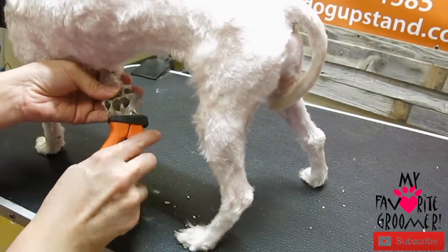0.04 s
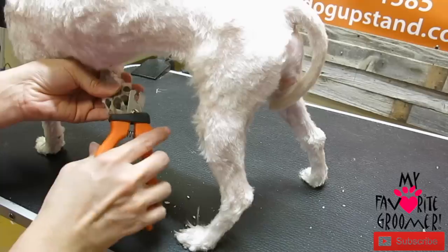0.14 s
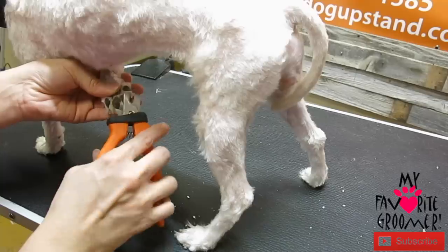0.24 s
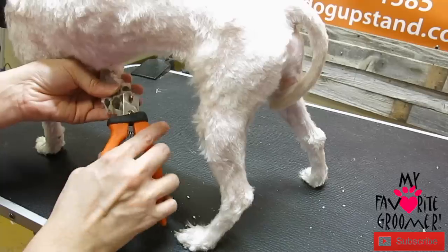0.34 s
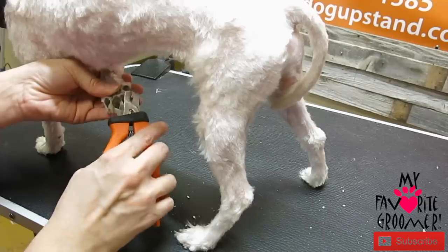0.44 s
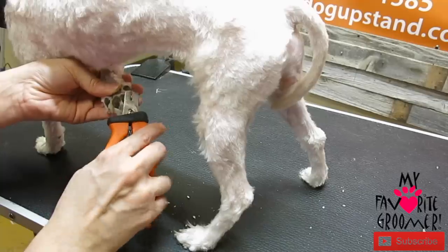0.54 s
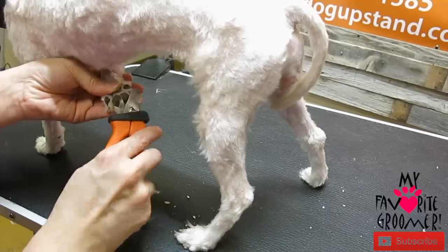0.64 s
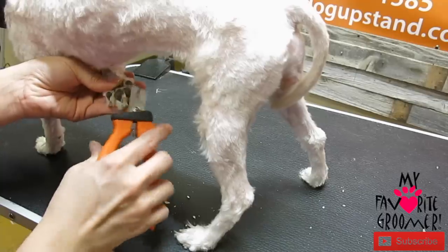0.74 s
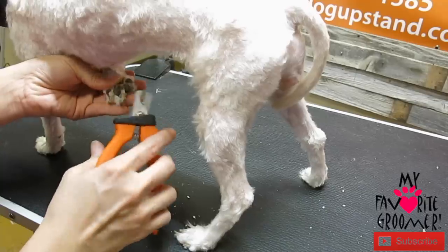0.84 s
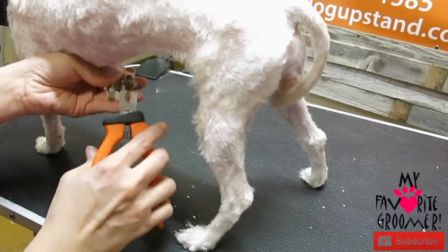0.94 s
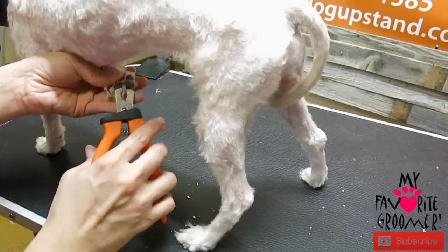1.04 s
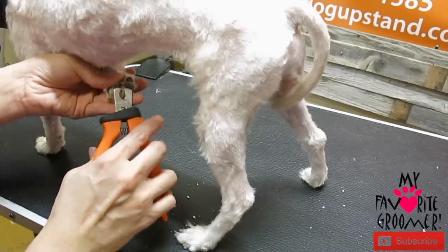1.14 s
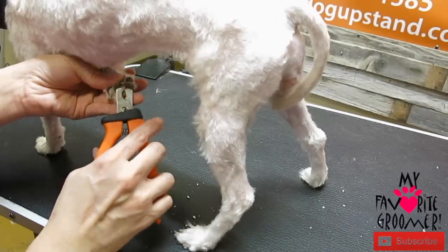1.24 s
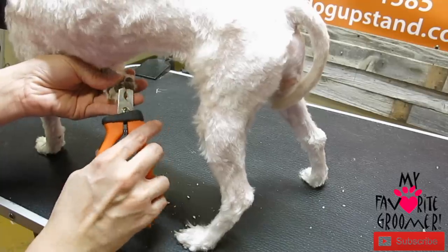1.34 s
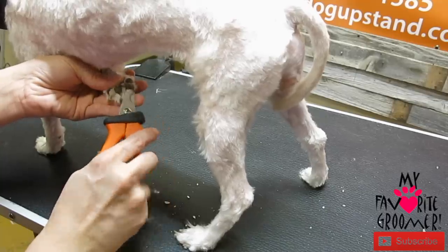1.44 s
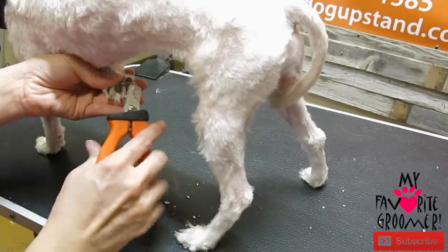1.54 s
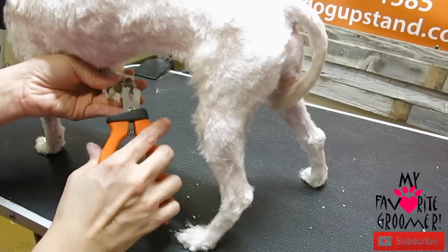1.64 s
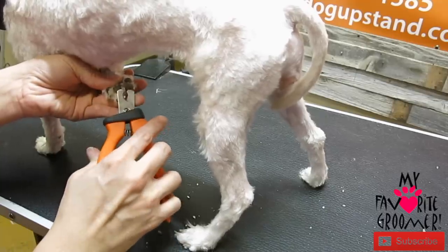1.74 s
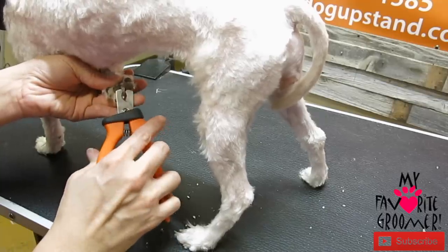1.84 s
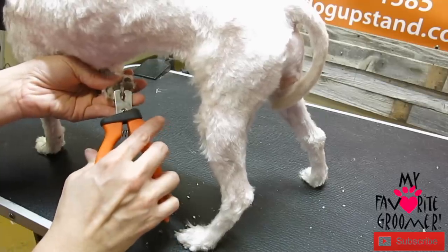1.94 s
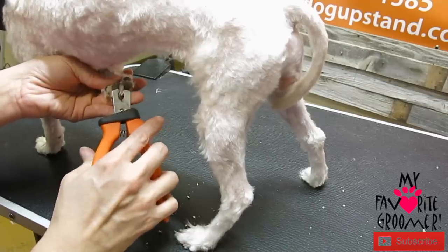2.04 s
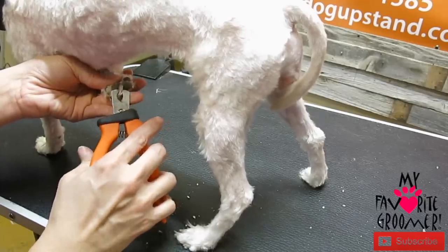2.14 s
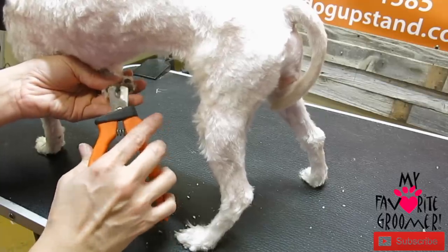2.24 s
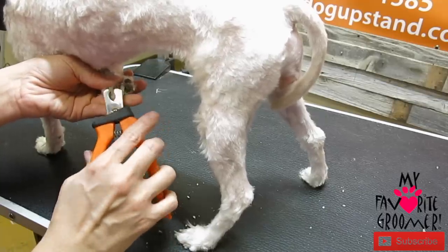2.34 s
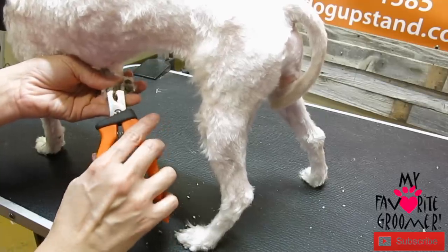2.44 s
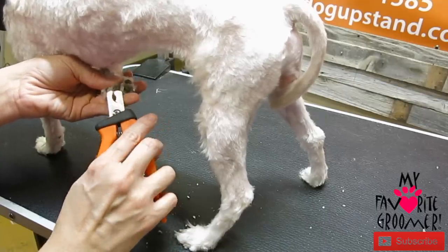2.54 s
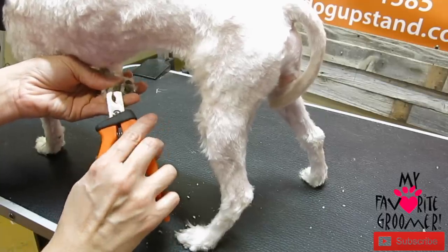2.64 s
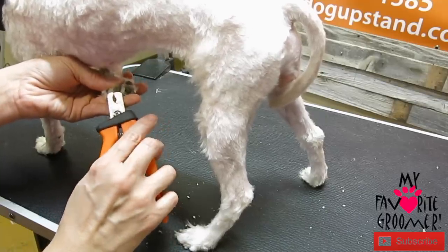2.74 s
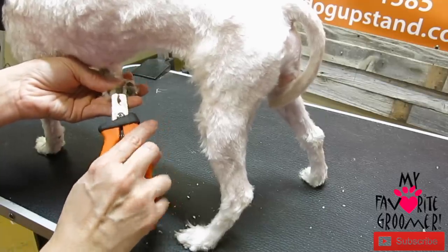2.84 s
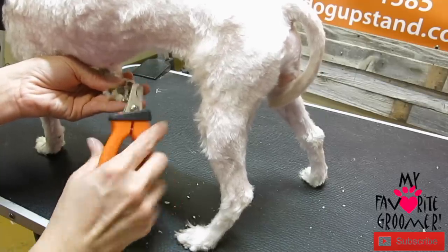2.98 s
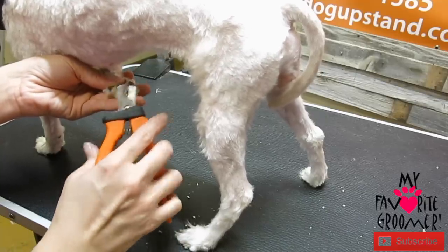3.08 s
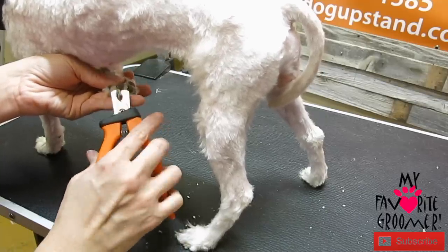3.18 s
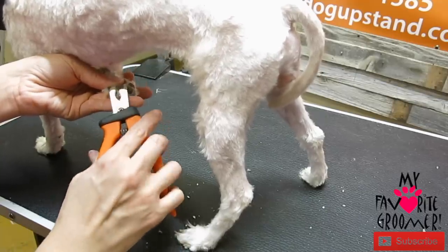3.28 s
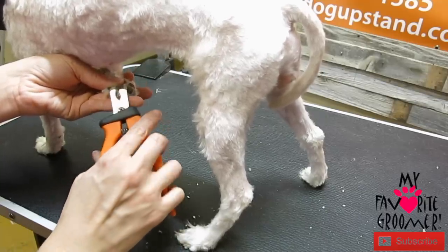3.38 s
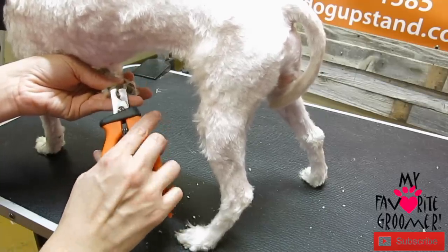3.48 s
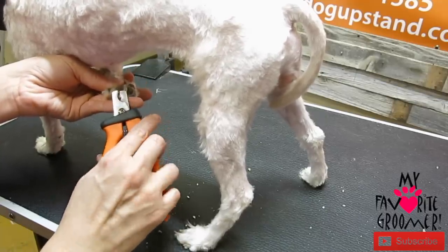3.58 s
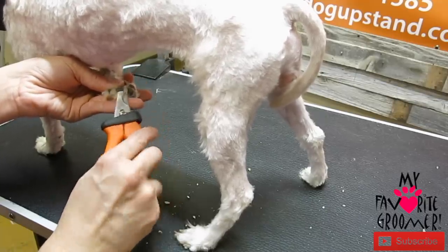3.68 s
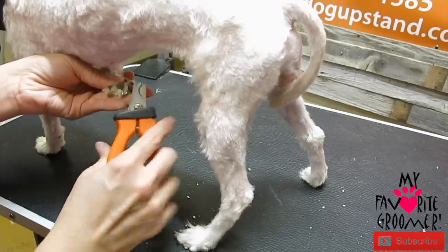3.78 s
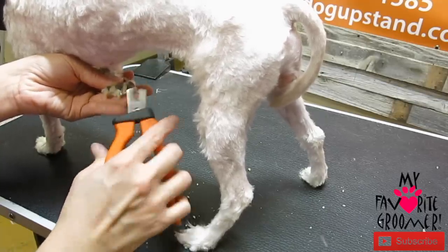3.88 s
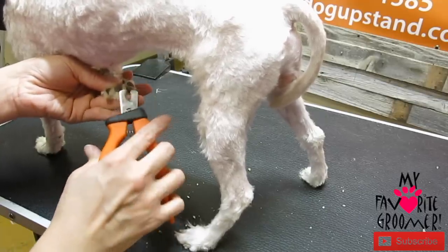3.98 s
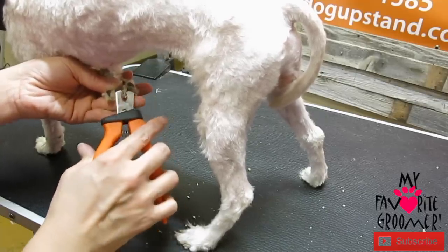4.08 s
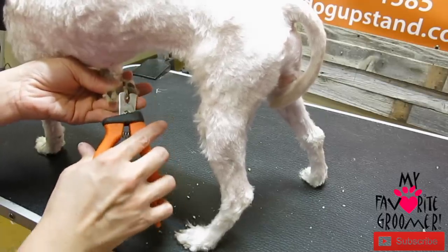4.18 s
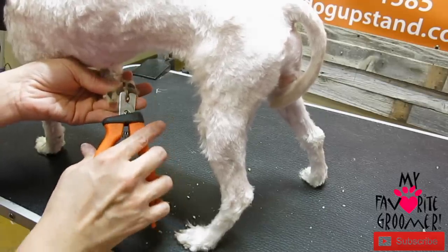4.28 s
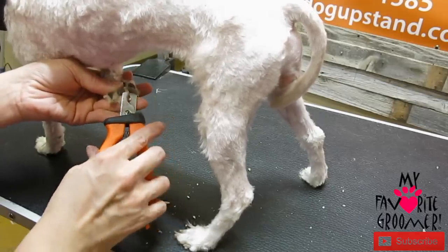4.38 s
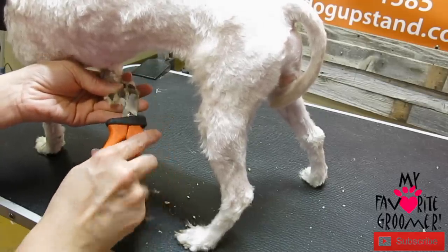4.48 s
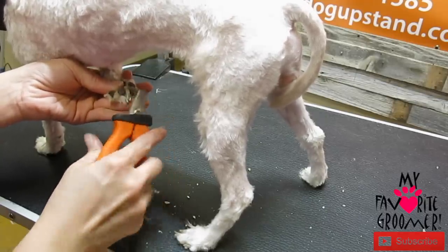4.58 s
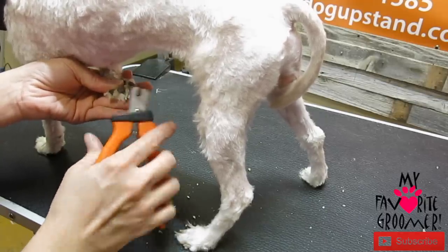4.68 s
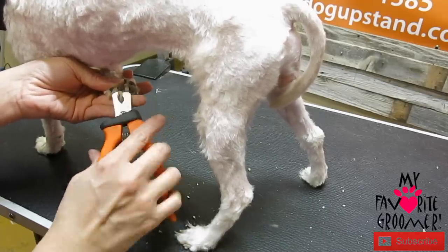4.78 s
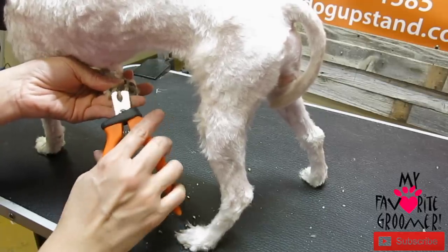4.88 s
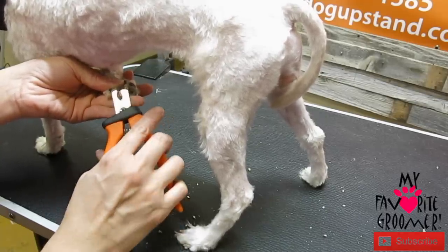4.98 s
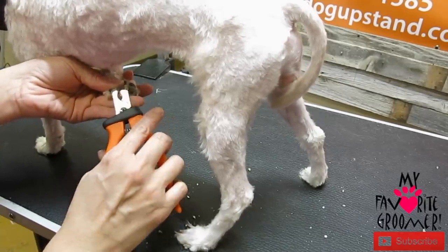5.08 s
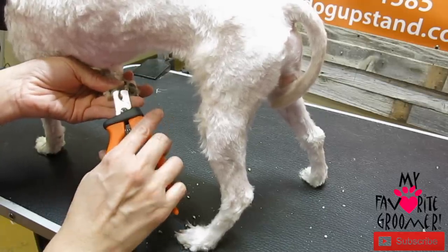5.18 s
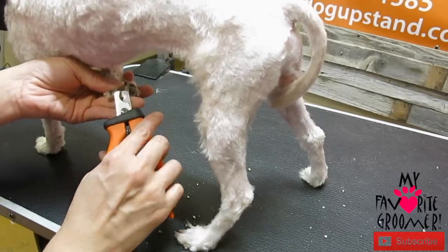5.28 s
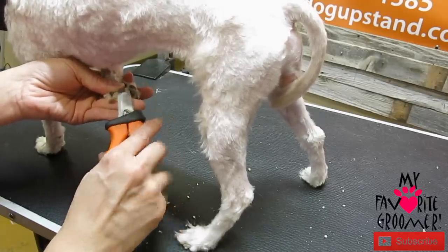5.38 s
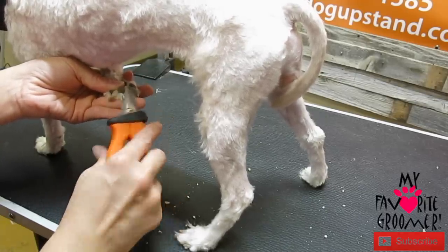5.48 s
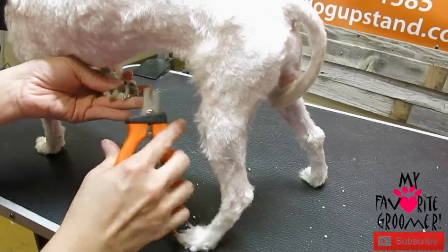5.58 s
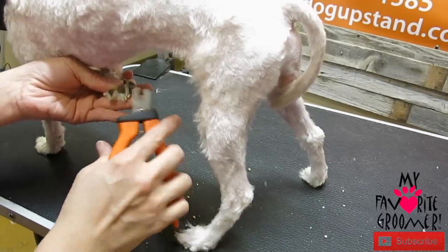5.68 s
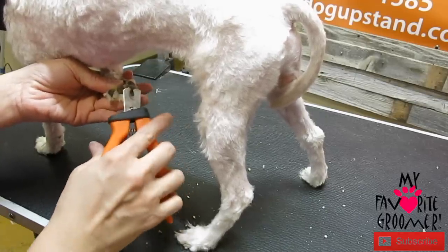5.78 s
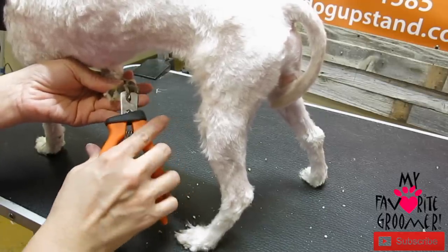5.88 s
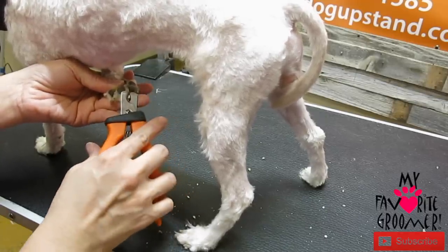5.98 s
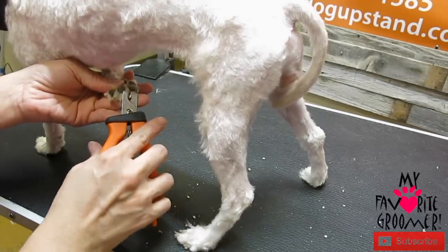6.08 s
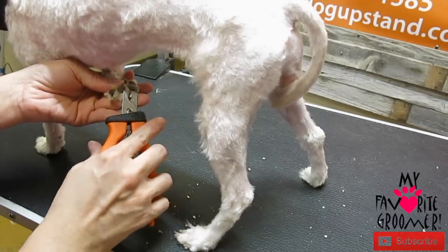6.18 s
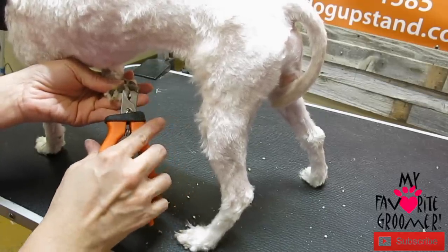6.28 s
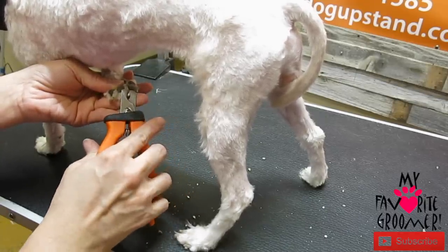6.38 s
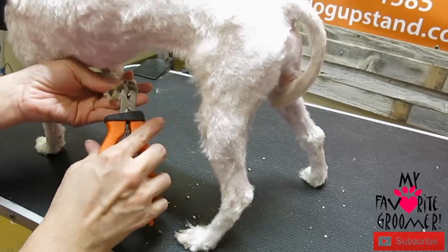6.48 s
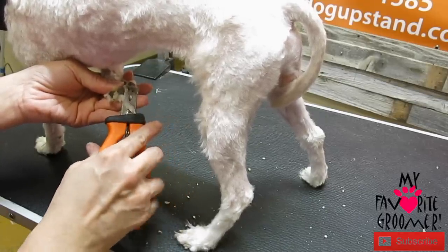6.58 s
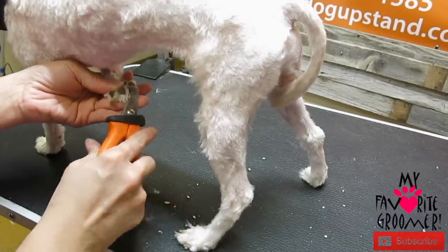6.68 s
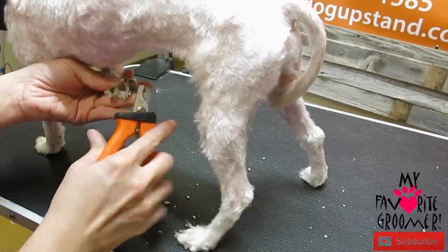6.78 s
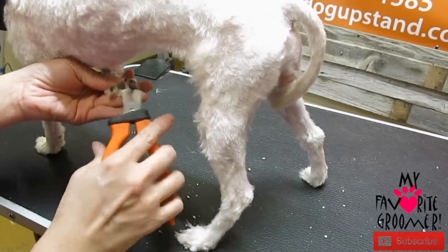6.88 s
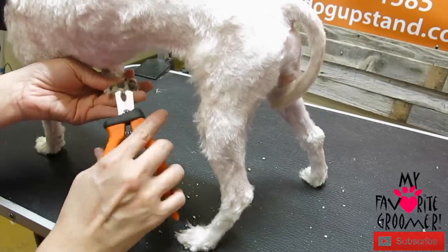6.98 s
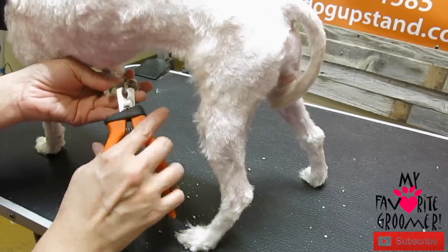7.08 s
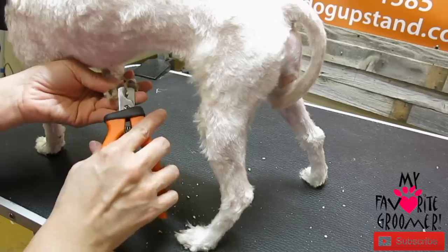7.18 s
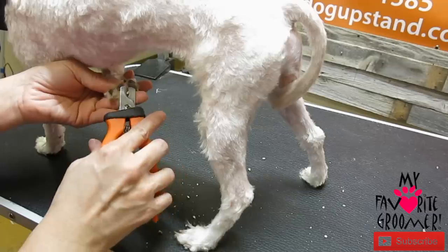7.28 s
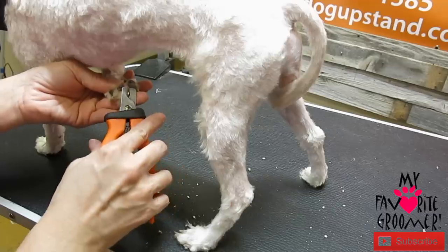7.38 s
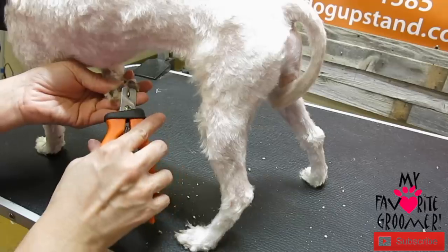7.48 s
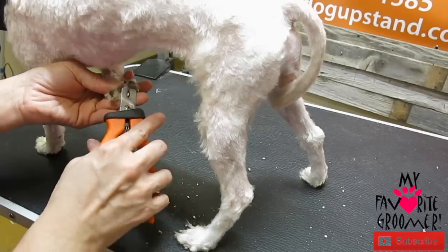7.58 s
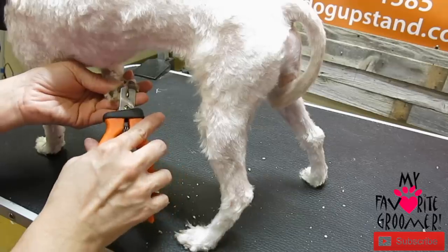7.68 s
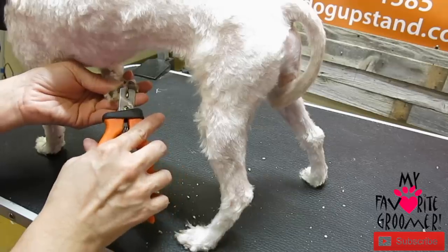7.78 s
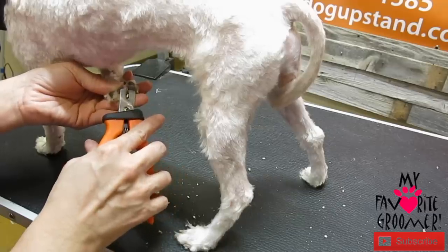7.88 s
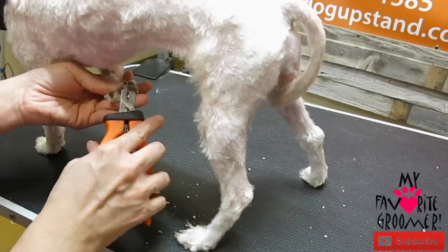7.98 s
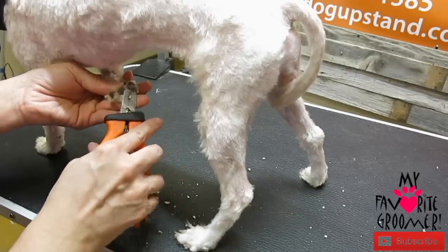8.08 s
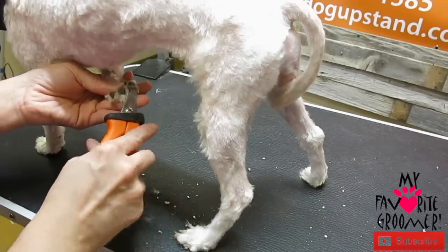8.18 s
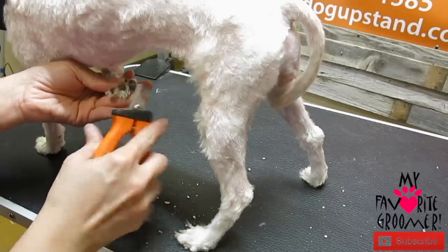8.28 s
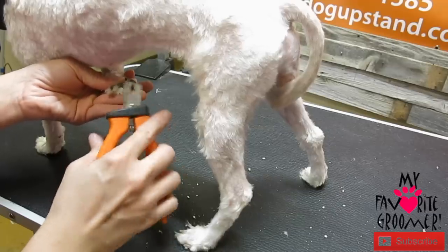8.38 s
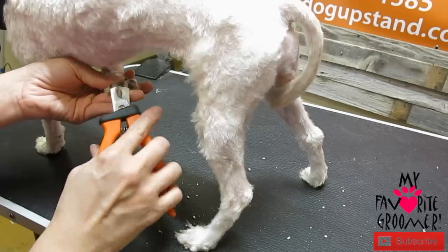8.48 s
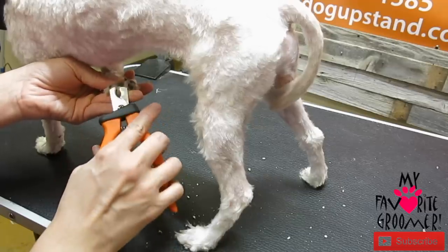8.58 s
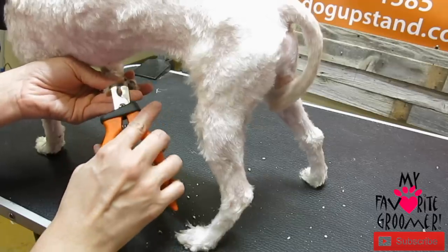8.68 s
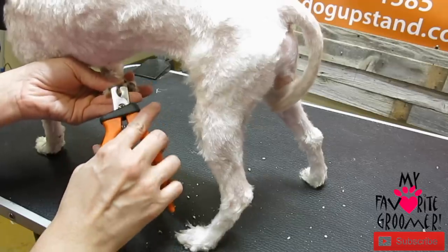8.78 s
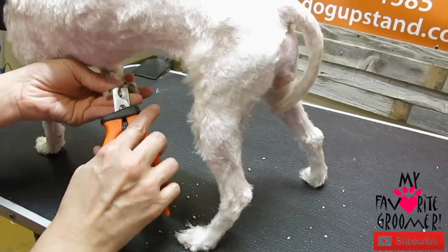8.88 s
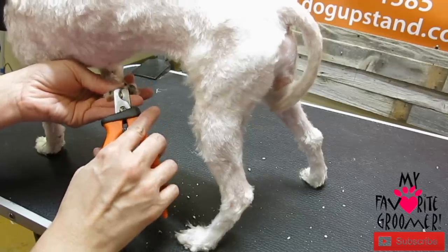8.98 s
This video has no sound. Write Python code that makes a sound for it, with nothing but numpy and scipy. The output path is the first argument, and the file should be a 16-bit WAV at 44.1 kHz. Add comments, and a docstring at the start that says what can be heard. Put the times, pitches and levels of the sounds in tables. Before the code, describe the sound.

Plier-style clippers cut a dog's nails right beside the microphones in a small room. Nine loud, crisp snaps come at uneven gaps, each a nail crack and a steel jaw slam almost fused, with a short bright echo. Small catching clicks and gritty creaks precede most cuts, and light handle ticks follow. Quiet ventilation and low motor hum lie behind, dipping after each snap and creeping back.

```python
"""Plier-style clippers cut a dog's nails close to the microphones, on a grooming table in a small room.
Each cut is two noise bursts: the nail cracks, then the jaws slam shut 2 to 26 ms later, with the room's echoes.
Before most cuts the blades catch and the nail creaks in random grains; between cuts the handles tick.
Behind are filtered-noise ventilation and rumble, and motors and mains hum made of sines.
The recorder's gain control ducks the room after every snap."""
import sys
import numpy as np
from scipy import signal
from scipy.fft import rfft, irfft, next_fast_len
from scipy.io import wavfile
from scipy.ndimage import uniform_filter1d

SR = 44100
rng = np.random.default_rng(int(sys.argv[2]) if len(sys.argv) > 2 else 0)


def int16_out(signal):
    """Quantize to a 16-bit WAV file."""
    q = np.round(np.clip(np.atleast_2d(signal).T, -1, 1) * 32767)
    wavfile.write(sys.argv[1], SR, q.astype(np.int16))


N = 398223
TIME = np.arange(N) / SR

# each cut, a crack of the nail and then the slam of the jaws: crack t/s, slam delay/s, crack level/dB,
# slam level/dB, knock level/dB (relative), knock f/Hz, knock resonance/dB, hollow of the handles/dB,
# slam's edge above 9 kHz/dB (relative), room send/dB
CUTS = [(0.0061, 0.015, 3.5, 10, -8, 1750, 5, -1, 7, 5.5), (0.6257, 0.026, 3, 10.5, -6, 2050, 4, 1, 8, 2.5),
        (1.4834, 0.0029, 12, 15.5, -7.5, 1960, 7.5, -1.5, 5.5, 1.5),
        (2.9430, 0.0024, 13.5, 12, -5.5, 1120, 2, -2.5, -0.5, 5.5),
        (3.7040, 0.0036, 11.5, 7.5, -6, 2430, 2, 1, 7.5, 6),
        (4.5308, 0.0035, 7, 10, -1, 2380, 1.5, -2.5, -3, 6),
        (5.46, 0.0035, 8.5, 9.5, -8, 1644, 6.5, 9, 7, 3.5),
        (6.6834, 0.0024, 10, 9.5, -6.5, 1850, 4.5, 3.5, 9, 2),
        (8.1791, 0.0072, 3, 10.5, -4, 1730, 10.5, -4.5, 7.5, 3.5)]
# how strongly the distant motor comes through: t/s, level/dB
MOTOR_LEVEL = [(0, -59.5), (1.0, -59.0), (1.2, -41.5), (1.42, -40.5), (1.65, -58.5), (2.8, -54.5),
               (3.2, -38.5), (4.2, -46.5), (5.1, -47), (6.1, -39), (7.0, -48.5), (7.95, -47), (9.0, -52.7)]


def from_db(db):
    """Decibels to gain."""
    return 10 ** (np.asarray(db) / 20)


def rms_one(x):
    """Scale to rms 1."""
    return x / np.sqrt(np.mean(x ** 2) + 1e-20)


def in_time(rows):
    """Each column of a curve, at every sample."""
    s, *columns = np.transpose(rows)
    return [np.interp(TIME, s, c) for c in columns]


def at_hz(points, hz):
    """Read a spectrum on a log-frequency axis."""
    f, value = np.transpose(points)
    return np.interp(np.log(hz + 1e-9), np.log(f), value)


def band_noise(low_hz, high_hz, shape):
    """White noise through a gentle band-pass filter."""
    sos = signal.butter(2, [low_hz, high_hz], "band", fs=SR, output="sos")
    return signal.sosfilt(sos, rng.standard_normal(shape))


def drift(rate_hz, step=100, settle=1000):
    """Slow random wander with rms 1: low-passed noise, drawn at every hundredth sample."""
    r = np.exp(-2 * np.pi * rate_hz * step / SR)
    noise = rng.standard_normal(N // step + settle + 2)
    slow = signal.lfilter([1], [1, -2 * r, r * r], noise)[settle:]
    return np.interp(np.arange(N) / step, np.arange(len(slow)), rms_one(slow))


def add(track, s, sound):
    """Mix a sound into a track at a time."""
    start = max(round(s * SR), 0)
    part = sound[..., :track.shape[-1] - start]
    track[..., start:start + part.shape[-1]] += part


def snaps(smear=0.79):
    """The cuts; the hand shades some, so they arrive more smeared and more by way of the room."""
    direct, echoes = np.zeros((2, 2, N))
    for s, colour, decay_s, room_db in blows():
        add(direct, s, contact(**colour, decay_s=decay_s * from_db(smear * room_db)))
        # the room gathers sound sent in every direction, which evens out the ripples of the burst
        all_round = contact(**colour, decay_s=.00006)
        # the tool jerks at every blow, so each one meets the room differently
        reflected = signal.fftconvolve(all_round, room_response(), axes=1)
        add(echoes, s, from_db(room_db) * reflected)
    return direct + steel(direct) + echoes


def blows():
    """Two blows per cut: the nail cracks with a woody knock, then the freed jaws meet, shorter and drier."""
    crack_edge_db = -3.5   # horn is duller than steel
    crack_decay_s, slam_decay_s = 0.00091, .0005
    slam_knock_db, slam_room_db = -7.5, -2.5   # relative to the crack
    for s, delay, crack_db, slam_db, knock_db, knock_hz, peak_db, hollow_db, edge_db, room_db in CUTS:
        grip = dict(knock_hz=knock_hz, peak_db=peak_db, hollow_db=hollow_db)
        nail = dict(grip, level_db=crack_db, knock_db=knock_db, edge_db=crack_edge_db)
        jaws = dict(grip, level_db=slam_db, knock_db=knock_db + slam_knock_db, edge_db=edge_db)
        yield s, nail, crack_decay_s, room_db
        yield s + delay, jaws, slam_decay_s, room_db + slam_room_db


def contact(level_db, knock_db, knock_hz, edge_db, decay_s, peak_db=6.5, hollow_db=0, width_hz=340, size=512):
    """One contact: a knock with a pitch of its own, hollow handles, and an edge in the top treble."""
    # colour of a contact on the clippers: f/Hz, level/dB
    contact_colour = [(150, -13.5), (420, -6), (720, -1), (1050, -7.5), (1800, 0.5), (2600, 2.5), (3500, 0),
                      (4700, 2), (6500, 1.5), (8200, 0), (9600, 2), (11500, 3.5), (13500, -2), (16000, -6)]
    hollow_hz, hollow_width_hz = 736, 170   # resonance of the plastic handles
    hz = np.arange(size // 2 + 1) * SR / size
    body = np.interp(hz, [3100, 4600], [1, 0]) * knock_db
    pitch = peak_db / (1 + ((hz - knock_hz) / width_hz) ** 2)
    hollow = hollow_db / (1 + ((hz - hollow_hz) / hollow_width_hz) ** 2)
    edge = np.interp(hz, [7800, 9300], [0, 1]) * edge_db
    colour = causal(level_db + at_hz(contact_colour, hz) + body + pitch + hollow + edge)
    lag_s = np.array([[0], [2.2e-5]])   # the left microphone is nearer
    return irfft(crack(decay_s) * colour * np.exp(-2j * np.pi * hz * lag_s))


def crack(decay_s, size=512, order=8):
    """Stereo spectrum of a dense noise burst, flat on the whole, less alike left and right as it gets higher."""
    t, hz = np.arange(size) / SR, np.arange(size // 2 + 1) * SR / size
    envelope = np.exp(-t / decay_s) * (1 - np.exp(-t / 0.00024))
    shared, *own = rfft(rng.standard_normal((3, size)) * envelope)
    spectrum = shared + np.interp(hz, [2000, 9000], [.3, .6]) * np.array(own)
    # divide by the smoothed spectrum, so that the colour comes from elsewhere
    power = np.mean(np.abs(spectrum) ** 2, axis=0)
    return spectrum / np.sqrt(uniform_filter1d(power, 2 * order + 1))


def causal(db):
    """Minimum-phase response for a dB spectrum: nothing sounds before the blow."""
    cepstrum = irfft(np.log(from_db(db)))
    half = len(cepstrum) // 2
    fold = np.r_[1, np.full(half - 1, 2), 1, np.zeros(half - 1)]
    return np.exp(rfft(cepstrum * fold))


def steel(struck):
    """The steel jaws and spring ring on faintly after every cut: decaying resonators driven by the blows."""
    # modes of the steel: f/Hz, level/dB, t60/s
    steel_modes = [(4340, -62, .16), (4730, -62, .11), (5150, -61, .16), (5910, -62, .14), (9400, -62, .12)]
    out = 0
    for hz, level_db, t60 in steel_modes:
        r, w = from_db(-60 / (t60 * SR)), 2 * np.pi * hz / SR
        ring = signal.lfilter([0, np.sin(w)], [1, -2 * r * np.cos(w), r * r], struck + 1e-18)
        out = out + from_db(level_db) * ring
    return out


def room_response(size=16384, count=18):
    """A few scattered reflections from near surfaces, then a diffuse tail that dies band by band."""
    # first reflections: delay t/s, level/dB
    first_echoes = [(.0066, -12.5), (.0079, -11), (.0094, -14), (0.0102, -17), (0.0118, -14.5)]
    # colour of the diffuse tail: f/Hz, level/dB
    tail_colour = [(200, -14.5), (1000, -7.5), (2500, -10), (5000, -6.5), (8000, -9.5), (11000, -12.5),
                   (15000, -12.5)]
    # how long the tail lasts: f/Hz, t60/s
    tail_t60 = [(200, 0.4), (1500, .22), (5000, .28), (10000, .26), (16000, .2)]
    t, response = np.arange(size) / SR, np.zeros((2, size))
    edges = np.geomspace(150, 17000, count + 1)
    build_up = np.clip((t - .004) / 0.012, 0, 1)
    for low, high in zip(edges, edges[1:]):
        hz = np.sqrt(low * high)
        decay = build_up * from_db(-60 * t / at_hz(tail_t60, hz))
        level = from_db(at_hz(tail_colour, hz)) / np.linalg.norm(decay)
        response += band_noise(low, high, (2, size)) * decay * level
    for delay, level_db in first_echoes:
        # start early, as the burst takes a moment to build up
        add(response, delay - .0004, from_db(level_db) * irfft(crack(decay_s=.0007)))
    return response


def handling(room_db=-1.5):
    """The small sounds between the cuts, with their room."""
    direct = bites() + ticks()
    return direct + from_db(room_db) * signal.fftconvolve(direct, room_response(), axes=1)[:, :N]


def bites(grit_hz=2200, grains_per_s=410, spread_db=4.0, count=36):
    """The blades catch with a click, then tiny splits run through the nail at random, at most until the cut."""
    # the blades bite on the nail: catch t/s, catch level/dB, typical grain level/dB
    bite_rows = [(0.584, -23.5, -37.5), (1.427, -25.5, -37), (2.8558, -19, -40.5), (3.658, -26, -41),
                 (4.4876, -9.5, -26), (5.3794, -30, -35.5), (6.655, -38.5, -41.5), (8.149, -31.5, -39)]
    # the nail starts to split before it gives: a second click, and grit that swells into the crack
    split_lead_s, split_db = .028, 11.5   # before the crack; above a typical grain
    grit_swell_db, grit_swell_s = 14, .006
    out = np.zeros((2, N))
    for start, catch_db, grit_db in bite_rows:
        end = min(cut[0] for cut in CUTS if cut[0] > start)
        catch = contact(catch_db, knock_db=-6.5, knock_hz=grit_hz, edge_db=-4.5, decay_s=0.0003)
        add(out, start, catch)
        split = contact(grit_db + split_db, knock_db=-6.5, knock_hz=grit_hz, edge_db=4.5, decay_s=0.0002)
        add(out, end - split_lead_s, split)
        times = start + np.cumsum(rng.exponential(1 / grains_per_s, count))
        swell_db = grit_swell_db * np.exp(-np.abs(end - times) / grit_swell_s)
        levels_db = rng.normal(grit_db, spread_db, count) + swell_db
        for s, grain_db in zip(times, levels_db):
            if s < end:
                grain = contact(grain_db, knock_db=-7.0, knock_hz=grit_hz, edge_db=0.5, decay_s=0.00015)
                add(out, s, grain)
    return out


def ticks(tick_hz=1250, count=4):
    """Single short contacts of the handles and spring, and faint ones while the grip shifts."""
    # handle ticks, mostly as they spring open after a cut:
    # t/s, level/dB, knock level/dB (relative), edge level/dB (relative)
    tick_rows = [(0.285, -21, -7, 5), (1.766, -26, -7, 0), (3.1678, -13.5, -6.5, -7), (3.2401, -22, -9, -3),
                 (3.8904, -13, 3, 0.5), (4.3583, -26, 7, -22), (4.7264, -17, -1.5, 0.5),
                 (5.6992, -16.5, -3, 2), (6.8823, -25, -2, -2), (8.3814, -14.5, -18.5, -12)]
    fidget_s, fidget_db = (1.6, 4.4), -34.5   # (from, to)
    out = np.zeros((2, N))
    faint = [(s, fidget_db, -7, -1) for s in rng.uniform(*fidget_s, count)]
    for s, level_db, knock_db, edge_db in list(tick_rows) + faint:
        add(out, s, contact(level_db, knock_db, tick_hz, edge_db, decay_s=0.00049, peak_db=7.0))
    return out


def motor():
    """A distant motor creeps up to its full speed, quickly at first, then levelling off."""
    # orders of the motor: multiple of the speed, level/dB (relative)
    motor_orders = [(1, 0.5), (2, -24.5)]
    start_hz, full_hz, settle_s = 114.6, 138.4, 3.8
    hz = full_hz + (start_hz - full_hz) * np.exp(-TIME / settle_s)
    return hum(hz, in_time(MOTOR_LEVEL)[0], motor_orders, waver_db=1.0)


def drone(fade_s=.15):
    """A second, less steady hum that fades in and out."""
    # when it is heard: start t/s, end t/s, f/Hz, level/dB
    drone_rows = [(0, 2.35, 86.3, -58), (4.1, 5.6, 81.9, -53)]
    # orders of the drone: multiple of the speed, level/dB (relative)
    drone_orders = [(1, -3.5), (2, 1.5), (3, -9.5)]
    out = 0
    for start, end, hz, level_db in drone_rows:
        # half way through the fade at the start and end times
        fade = np.clip(np.minimum(TIME - start, end - TIME) / fade_s + .5, 0, 1)
        out = out + fade * hum(hz + 0.5 * drift(1.6), level_db, drone_orders, waver_db=3.5)
    return out


def hum(hz, level_db, orders, waver_db):
    """Low orders of a turning machine: sines at multiples of its speed, each wavering a little in level."""
    turns = 2 * np.pi * np.cumsum(hz) / SR
    out = 0
    for multiple, order_db in orders:
        gain = from_db(level_db + order_db + waver_db * drift(4.6))
        out = out + gain * np.sin(round(multiple) * turns)
    return np.sqrt(2) * out


def rumble(below_motor_db=-17.5, low_hz=45, high_hz=85):
    """Low band of noise that swells with the motor."""
    noise = band_noise(low_hz, high_hz, N)
    return rms_one(noise) * from_db(in_time(MOTOR_LEVEL)[0] + below_motor_db)


def ventilation():
    """Smooth rush of air: shaped noise, centred in the bass and wide in the middle."""
    # colour of the air: f/Hz, level per Hz/dB (relative)
    rush_colour = [(25, -24.5), (55, -6), (100, 0.5), (150, 7), (230, -2), (400, -5), (900, -7),
                   (1500, -11.5), (2200, -17), (3100, -23.5), (6000, -24), (10000, -29.5), (15500, -34.5)]
    # strength of the air: t/s, level/dB
    rush_level = [(0, -48), (3.6, -49), (4.8, -46.5), (5.8, -48.5), (9.03, -47)]
    # left-right likeness: f/Hz, correlation (-1..1)
    left_right = [(130, .999), (200, 1), (300, .5), (640, -0.52), (1400, -0.64), (3100, 0.08), (6800, .15),
                  (15000, 0.24)]
    size = next_fast_len(N)
    mid, side = rfft(rng.standard_normal((2, size)))
    hz = np.arange(len(mid)) * SR / size
    alike = np.clip(at_hz(left_right, hz), -1, 1)
    pair = np.sqrt(1 + alike) * mid + np.sqrt(1 - alike) * side * [[1], [-1]]
    air = irfft(pair * from_db(at_hz(rush_colour, hz)), size)[:, :N]
    return rms_one(air) * from_db(in_time(rush_level)[0])


def mains():
    """Steady electrical sines, each from a random phase."""
    # mains hum and a faint electronic whine: f/Hz, level/dB
    steady_tones = [(59.3, -67.5), (120, -51.5), (15700, -85.5)]
    out = 0
    for hz, level_db in steady_tones:
        out = out + from_db(level_db) * np.sin(2 * np.pi * (hz * TIME + rng.random()))
    return np.sqrt(2) * out


def far_scuff(at_s=7.7, length_s=.08, level_db=-60, low_hz=850, high_hz=1350):
    """A faint, hollow scuff somewhere far off: band noise that swells and fades."""
    noise = band_noise(low_hz, high_hz, (2, N))
    return from_db(level_db) * rms_one(noise) * np.exp(-((TIME - at_s) / length_s) ** 2)


def scene():
    """Clippers close by, machines behind."""
    clippers = snaps() + handling()
    machines = motor() + drone() + rumble() + ventilation() + mains()
    return clippers + machines + far_scuff()


def gain_control(sound, threshold_db=-31.0, share=0.36, release_db_per_s=4.0, attack_s=0.02, size=441):
    """Loud sounds pull the gain down quickly; it creeps back at a steady rate in dB."""
    power = uniform_filter1d(np.mean(sound ** 2, axis=0), size)
    over_db = 10 * np.log10(np.abs(power) + 1e-12) - threshold_db
    cut_db = share * np.maximum(over_db, 0)
    release_db = release_db_per_s * TIME
    held_db = np.maximum.accumulate(cut_db + release_db) - release_db
    r = np.exp(-1 / (attack_s * SR))
    return sound * from_db(-signal.lfilter([1 - r], [1, -r], held_db))


def record(dry, cutoff_hz=16000):
    """Gain control, overload on the sharpest peaks, top cut."""
    clipped = np.clip(gain_control(dry), -1, 1)
    return signal.sosfilt(signal.ellip(10, .1, 70, cutoff_hz, fs=SR, output="sos"), clipped)


dry = scene()
out = record(dry)
int16_out(out)
```